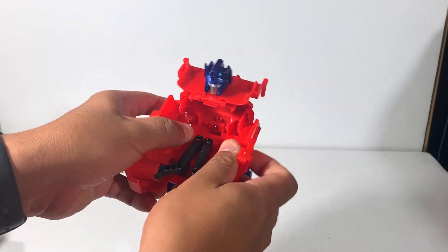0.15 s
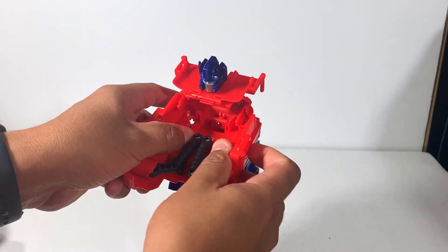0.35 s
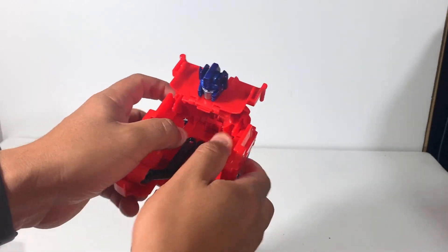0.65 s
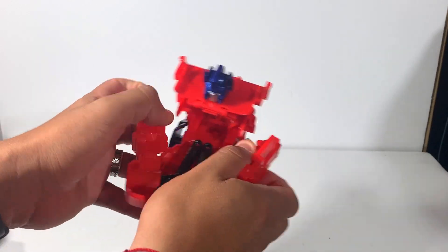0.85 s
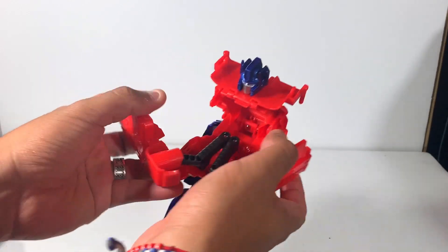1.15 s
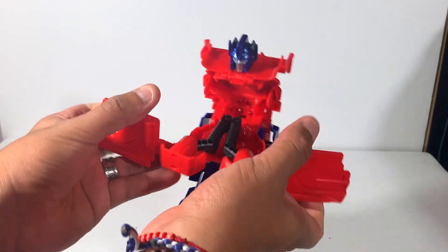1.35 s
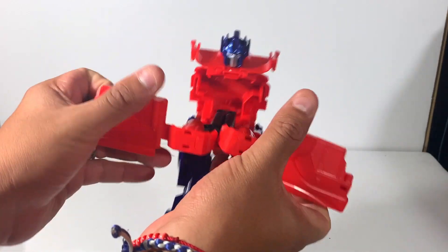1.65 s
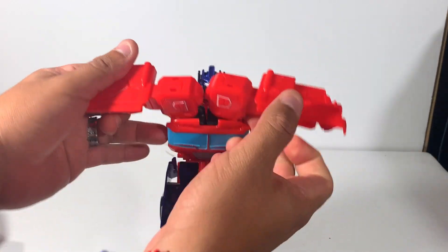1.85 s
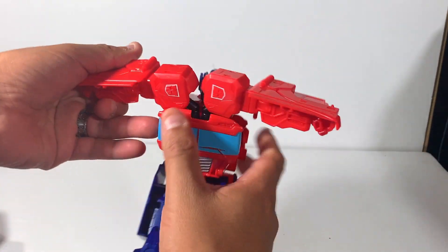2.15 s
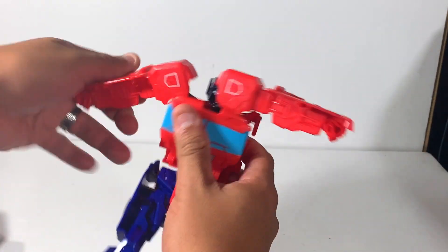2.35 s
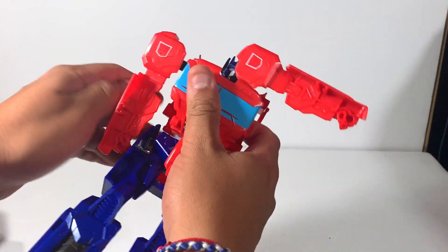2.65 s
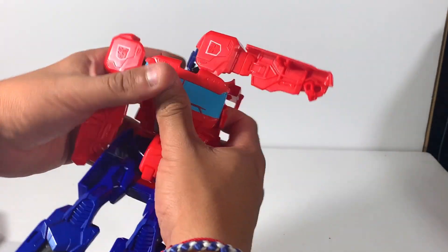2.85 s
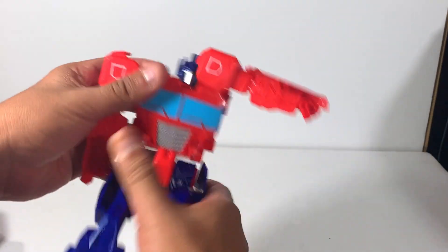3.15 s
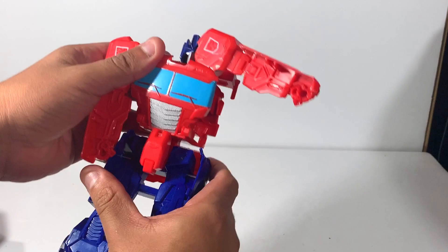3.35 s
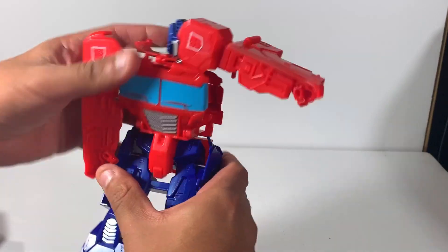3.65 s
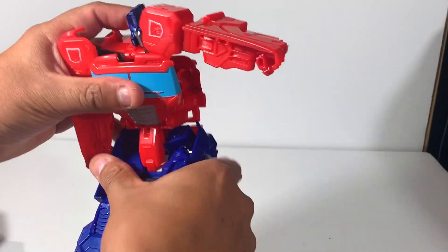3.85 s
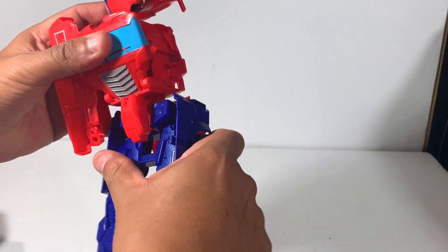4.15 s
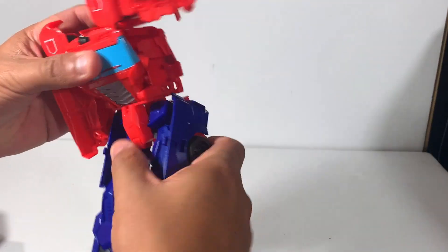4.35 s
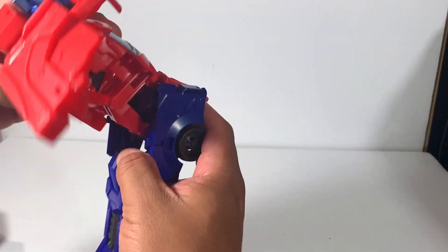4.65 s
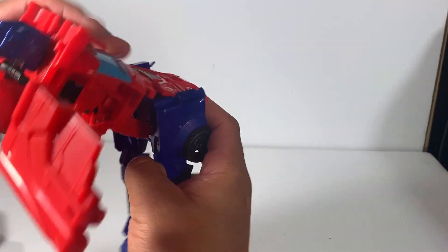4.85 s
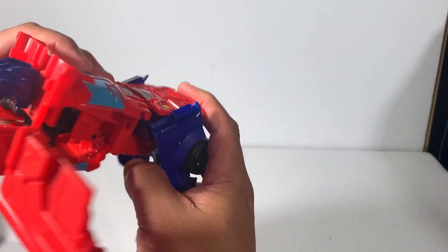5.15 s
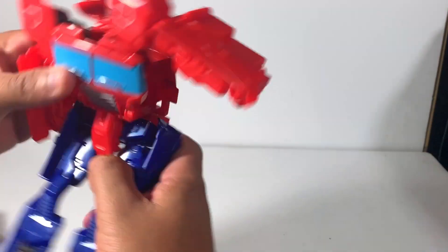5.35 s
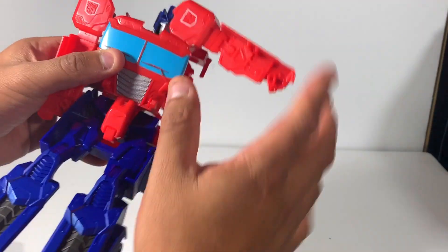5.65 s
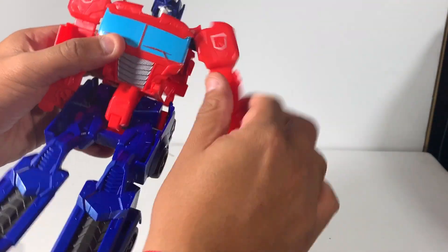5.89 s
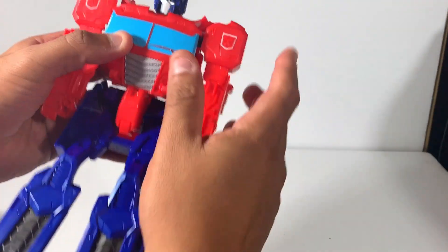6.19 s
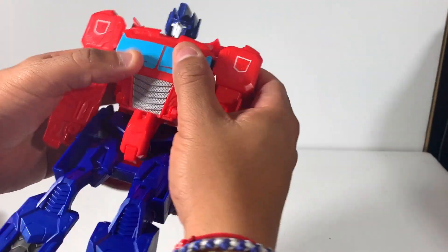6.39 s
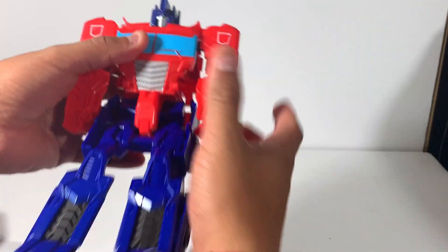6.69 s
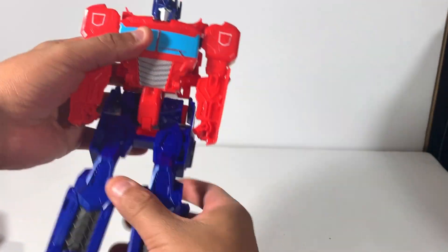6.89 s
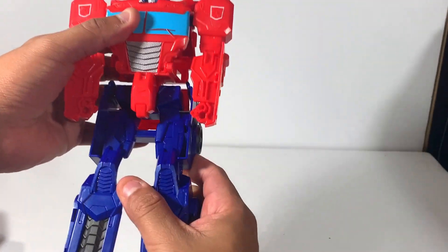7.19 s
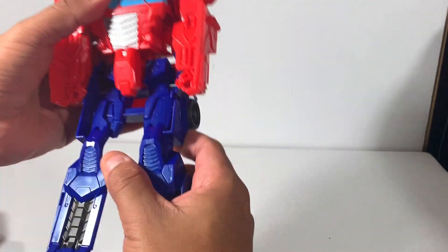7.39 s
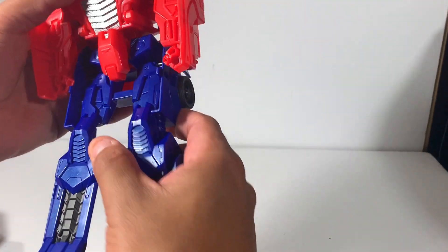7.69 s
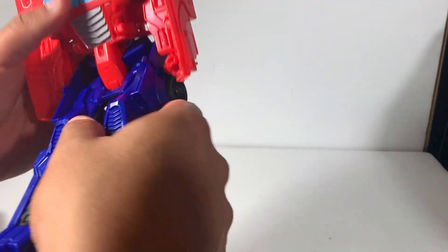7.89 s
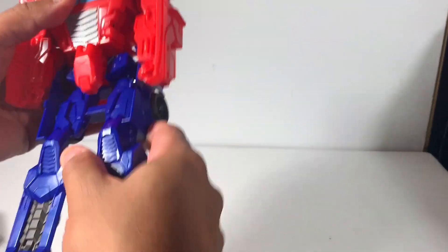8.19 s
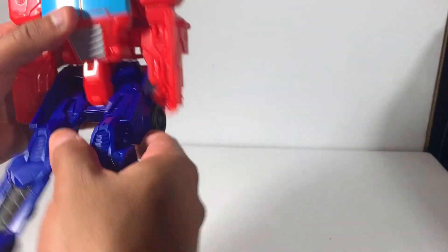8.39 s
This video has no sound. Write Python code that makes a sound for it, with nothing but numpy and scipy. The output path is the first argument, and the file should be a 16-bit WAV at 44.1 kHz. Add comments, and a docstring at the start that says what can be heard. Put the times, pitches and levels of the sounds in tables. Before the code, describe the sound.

Hands twist and snap the hollow plastic parts of a toy figure, sharp clicks and clacks in irregular bursts with faint rubbing between.

```python
"""In a small padded booth, hands twist and snap the parts of a hollow plastic toy close to two microphones.
Each snap is a short burst of chattering contact, shaped noise and one hard blow, that cracks and rings the parts.
Between snaps random grains rub and rattle, narrow resonances of friction squeak faintly and low noise swells
as the hands bump softly. The toy sits left of centre, so the right microphone hears it a little later."""
import sys
import numpy as np
from scipy import signal
from scipy.fft import rfft, irfft, next_fast_len
from scipy.io import wavfile
from scipy.ndimage import map_coordinates

SR = 44100
rng = np.random.default_rng(int(sys.argv[2]) if len(sys.argv) > 2 else 0)


def transcribe(signal):
    """Save signal, clipped to [-1, 1], as a 16-bit WAV file at the path in sys.argv[1]."""
    frames = np.atleast_2d(signal).T
    limited = np.clip(frames, -1, 1)
    pcm = np.round(limited * 32767).astype(np.int16)
    wavfile.write(sys.argv[1], SR, pcm)


N = 376173

# Snaps and knocks: [t/s, drive of the middle parts level/dB, big shells re middle level/dB,
# small tabs re middle level/dB, pitch of the struck part f/Hz]
SNAPS = [(0.0171, -24.5, 1, 4.5, 1470), (0.1764, -45, 7, -4, 1960), (0.225, -48, 10, 9, 1250),
         (0.2372, -36, 3.5, 10.5, 1070), (0.281, -27, -4, 3, 1920), (0.417, -49.5, 0, -10, 1630),
         (0.4928, -23.5, 5, 2.5, 1635), (0.643, -39.5, -20, -19, 7100), (0.717, -52, 6, -15, 2860),
         (0.8102, -25, -4, 9.5, 5520), (0.845, -21.5, -18, -5, 2780), (1.3429, -36, -9, -39, 2120),
         (1.5016, -22.5, -12, -13, 2580), (1.74, -39, -38, -27, 5040), (1.772, -46.5, 0, -17, 2230),
         (2.0018, -29.5, -23, -6, 4500), (2.08, -28.5, 2.5, -12, 2540), (2.2038, -45, -8, -7, 4900),
         (2.228, -24, -14, -32, 5450), (2.2742, -21, -8, -4, 5340), (2.404, -45, 1.5, -22, 3020),
         (2.4568, -27.5, -0.5, 6.5, 3820), (2.58, -37.5, -2, 3, 6000), (2.5976, -15, 0, 5, 2410),
         (2.6937, -41, -41, 20.5, 2820), (2.7295, -24.5, -47.5, 9.5, 2820), (2.7631, -27, -6, 12.5, 6450),
         (2.789, -24.5, -24, 7.5, 2840), (2.8844, -19.5, 0, 15.5, 4170), (3.035, -34, -8, 9, 2570),
         (3.093, -38, -0.5, 5, 1110), (3.13, -37, -11, 8.5, 3160), (3.1489, -32.5, 6.5, 9, 1490),
         (3.1937, -12, -35, 13.5, 5850), (3.2059, -16.5, 2, 11, 1830), (3.238, -20, -14, -17, 2420),
         (3.2598, -24.5, 3.5, 8.5, 1197), (3.383, -39.5, -6, -23.5, 4750), (3.6103, -22.5, -3.5, -5, 1910),
         (3.6392, -18.5, 3, 7, 3920), (3.728, -12, -9, 6, 4500), (3.759, -30, 4, 9, 2600),
         (3.804, -26.5, 0.5, 5, 1670), (3.8535, -26, -0.5, 6.5, 6550), (3.8955, -39, 8.5, 6, 1930),
         (3.938, -35, -21, -3, 4760), (4.07, -34, -1, -4, 4760), (4.1044, -25, -0.5, 3.5, 4480),
         (4.3286, -35, -3.5, 6.5, 4470), (4.442, -35, -4.5, -10, 2780), (4.51, -32, -2, -6, 4700),
         (4.55, -37.5, -11, -5, 5070), (4.7732, -43, 8.5, -24, 2920), (4.815, -32, -23, -11, 3480),
         (4.874, -32.5, -2, -3, 3680), (4.8925, -27.5, 1, 4.5, 1210), (5.1176, -37.5, 3, 6, 3650),
         (5.1966, -38.5, -19, -13, 3800), (5.244, -33.5, 2, -2, 990), (5.3623, -35.5, -28, -11, 4270),
         (5.4056, -28, -5, 1, 5000), (5.4571, -24, -0.5, -14, 5120), (5.5172, -28.5, -2.5, 4, 4800),
         (5.598, -50, 8, -17, 3500), (5.874, -13.5, -1.5, -5.5, 2020), (5.915, -14, -7, 7.5, 5220),
         (6.042, -29, -4.5, 0, 1190), (6.1545, -36, 7, 6.5, 2230), (6.2111, -38, 6.5, -19, 1730),
         (6.2668, -29, -7, 0, 4260), (6.351, -23, 3.5, 1.5, 4370), (6.516, -21.5, -2.5, 1, 2350),
         (6.6865, -18.5, -31, 3.5, 5570), (6.6945, -16, -9.5, 15, 4270), (6.7028, -22.5, -21, -3, 4460),
         (6.813, -26.5, -1, 0, 5200), (6.844, -27.5, -25, -1, 4600), (6.9301, -25, -52, 1.5, 5330),
         (6.9504, -27, -3.5, 3, 5200), (7.0723, -45, 0.5, -8.5, 4300), (7.12, -51, 6.5, -5.5, 1280),
         (7.295, -53.5, 5.5, -3, 2850), (7.4142, -45, -1, -24, 5700), (7.692, -57, 6, -8, 1006),
         (7.727, -47, -2, 0, 5000), (7.741, -27.5, -7, -7, 2110), (7.862, -42.5, 7, -1, 1600),
         (7.881, -19, -6, -6, 1680), (7.902, -24, 1.5, -1.5, 5300), (8.016, -33, -26, -9, 5660),
         (8.074, -29.5, 4, 1, 3520), (8.104, -36, -22, 9, 5040), (8.153, -29.5, -3, 6.5, 5300),
         (8.3049, -26, -1.5, -7, 2400), (8.345, -18, -6, 1, 2440), (8.369, -20.5, -2, -1, 1660),
         (8.396, -26, 2, -5, 4840), (8.4356, -16.5, -3.5, -1, 2580), (8.4593, -12.5, -4, -6, 2060),
         (8.4703, -13.5, -14, 8.5, 2600), (8.4839, -17, -3, 8.5, 3560), (8.507, -26, -17, 5, 4770)]
# Twists and slides of part on part: [start of the hold t/s, hold t/s, middle parts level/dB,
# brightness/dB (raises the small tabs, lowers the big shells)]
TWISTS = [(0.0, 0.0064, -54, -5.5), (0.271, 0.038, -57.5, -2.5), (.66, 0.096, -68, 3),
          (.76, 0.034, -62.5, 0.5), (0.848, 0.0062, -43.5, -3), (1.08, 0.0093, -62.5, 2.5),
          (1.23, 0.66, -71, 1.5), (1.8, 0.016, -65, 12.5), (1.9, 0.18, -72.5, -1), (2.234, 0.08, -50, 2.5),
          (2.471, 0.023, -55, 0), (2.619, 0.036, -53, -2.5), (2.82, 0.12, -64, -5.5),
          (2.95, 0.095, -53.5, 0.5), (3.1, 0.19, -48, 0.5), (3.637, 0.057, -47.5, -1),
          (3.75, 0.08, -60.5, 4), (3.92, 0.085, -58, -3), (4.053, 0.042, -49, -0.5),
          (4.35, 0.047, -55.5, -1), (4.519, 0.1, -60.5, -4), (4.77, 0.044, -48, 1.5),
          (4.96, 0.063, -59, -0.5), (5.203, 0.096, -53.5, -2), (5.404, 0.054, -45, 1),
          (5.78, 0.017, -66.5, -0.5), (5.892, 0.038, -40.5, 2.5), (6.0, 0.12, -59.5, 0),
          (6.2, 0.41, -64.5, -1), (6.44, 0.023, -51, -4.5), (6.6, 0.14, -60, -3.5), (6.832, .13, -50, -0.5),
          (7.43, 0.011, -70, 0.5), (7.897, 0.0016, -46.5, 0), (8.101, 0.058, -50, -2),
          (8.46, 0.011, -50, 4)]
# Broad crack of big shells, middle parts, small tabs: [low f/Hz, high f/Hz, level/dB, chatter t60 t/s]
CRACK_BANDS = [(800, 3430, -12, 0.034), (3370, 7920, -6.5, 0.019), (7840, 13070, -7, 0.024)]

SEAT_S = 0.002            # from the start of a snap to the hard blow that seats the part
RING_SPREAD_DB = 4.0      # chance in the strength of blows, catches and struck modes


def from_db(db):
    """Turns decibels into an amplitude factor."""
    return 10 ** (np.asarray(db) / 20)


def rms_one(x):
    """Brings a signal to rms 1."""
    return x / np.sqrt(np.mean(x ** 2) + 1e-20)


def coloured(x, points):
    """Shapes the spectrum of a signal by (Hz, dB) points, joined along log frequency."""
    size = next_fast_len(N)
    hz = np.maximum(np.arange(size // 2 + 1) * SR / size, 1)
    point_hz, point_db = np.array(points).T
    gain = from_db(np.interp(np.log(hz), np.log(point_hz), point_db))
    return irfft(rfft(x, size) * gain, size)[..., :N]


def drift(rate):
    """Slow random wander of rms 1, with `rate` new values per second."""
    knots = rng.standard_normal(int(N / SR * rate) + 2)
    return rms_one(np.interp(np.arange(N) / SR * rate, np.arange(len(knots)), knots))


def ring(force, hz, width):
    """One damped mode: a unit click sets a sine of about height 1 ringing."""
    r, w = np.exp(-np.pi * width / SR), 2 * np.pi * hz / SR
    return signal.lfilter([0, np.sin(w)], [1, -2 * r * np.cos(w), r * r], force + 1e-18)


def contact_envelope(times, level_db, rise_s, t60):
    """Every contact adds a quick build-up and an exponential decay."""
    jumps = np.zeros(N)
    jumps[(times * SR).astype(int)] = from_db(level_db)
    fall, rise = from_db(-60 / (t60 * SR)), np.exp(-1 / (rise_s * SR))
    return signal.lfilter([1 - rise], np.convolve([1, -fall], [1, -rise]), jumps + 1e-18)


def part_of(hz):
    """Size class that sounds a pitch: 0 big shells, 1 middle parts, 2 small tabs."""
    return int(hz > 3000) + int(hz > 7000)


def air():
    """Steady room tone and hiss: shaped noise, partly common to both sides."""
    # Relative spectrum of the air: [f/Hz, level/dB]
    air_spectrum = [(20, -45.5), (36, -15.5), (75, -13), (170, -24), (300, -27), (1400, -42),
                    (14400, -40.5), (16000, -52)]
    air_db, alike = -66.0, 0.75   # overall rms, left-right correlation
    mid, side = coloured(rng.standard_normal((2, N)), air_spectrum)
    stereo = np.sqrt(1 + alike) * mid + np.sqrt(1 - alike) * side * [[1], [-1]]
    return from_db(air_db) * rms_one(stereo)


def booth(x):
    """Dense dull reflections, unrelated on the two sides; their pattern keeps changing as the toy moves."""
    t60_s, wall_low_hz, wall_cut_hz = 0.091, 400, 4880
    t, out = np.arange(SR // 4) / SR, 0
    # three reflection patterns share the sound by wandering amounts of constant total power
    places = np.array([drift(12) for _ in range(3)])
    places /= np.sqrt(np.sum(places ** 2, axis=0))
    walls = signal.butter(1, [wall_low_hz, wall_cut_hz], "band", fs=SR)
    for share in places:
        decay = from_db(-60 * t / t60_s) * np.minimum(t / 0.0014, 1)
        tail = signal.lfilter(*walls, rng.standard_normal((2, len(t))) * decay)
        tail /= np.sqrt(np.sum(tail ** 2, axis=1, keepdims=True))
        out = out + signal.oaconvolve((share * x)[None], tail, axes=1)[:, :N]
    return out


def microphones(x):
    """The longer path delays the right microphone; the low end is stronger on the left."""
    # Lag of the right microphone as the toy moves: [t/s, lag t/s]
    right_lag = [(0, .0001), (2.3, 0.000092), (2.6, 0.0002157), (8.53, 0.00022)]
    # Balance of the two sides: [f/Hz, left over right level/dB]
    left_over_right = [(100, 1), (300, 5), (1200, 4), (3000, 0), (10000, 0)]
    booth_db = -2.5   # reflections relative to the direct sound
    lag_t, lag_s = np.transpose(right_lag)
    lag = np.interp(np.arange(N) / SR, lag_t, lag_s)
    delayed = map_coordinates(x, [np.arange(N) - lag * SR], order=3)
    left, right = from_db(booth_db) * booth(x) + [x, delayed]
    # each side takes half of the difference
    return np.array([coloured(left, [(hz, db / 2) for hz, db in left_over_right]),
                     coloured(right, [(hz, -db / 2) for hz, db in left_over_right])])


def hands():
    """Soft bumps of the hands: lumpy low noise that swells and dies, over the faint unrest of the grip."""
    # Bumps: [t/s, nominal level/dB]
    hand_bumps = [(.24, -56), (0.7, -52), (0.807, -48.5), (4.08, -61.5), (4.44, -51.5), (5.1, -60),
                  (5.399, -48.5), (6.55, -51), (7.3, -66), (7.88, -53), (8.101, -50.5), (8.2, -55)]
    rise_s, t60_s, rest_db = 0.0067, 0.5, -72
    times, level_db = np.transpose(hand_bumps)
    bumps = contact_envelope(times, level_db, rise_s, t60_s)
    low_band = signal.butter(2, [135, 430], "band", fs=SR, output="sos")
    noise = signal.sosfilt(low_band, rng.standard_normal(N))
    return (bumps + from_db(rest_db)) * rms_one(noise * from_db(3 * drift(25)))


def grains():
    """Rubbing: tiny slips at random moments, a few much larger than the rest, slightly blunted; rms 1."""
    grains_per_s, spread_db = 3000, 4.5
    sizes = from_db(spread_db * np.minimum(rng.exponential(1, N), 5)) * rng.choice([-1, 1], N)
    slips = sizes * (rng.random(N) < grains_per_s / SR)
    return rms_one(signal.lfilter(*signal.butter(1, 9000, fs=SR), slips))


def squeaks():
    """A tight joint squeaks: grainy friction twice through one resonance, swelling and fading."""
    # Squeaks: [start t/s, length t/s, pitch f/Hz, level before the swell and fade/dB]
    joint_squeaks = [(1.645, 0.092, 2577, -62.5), (1.775, 0.068, 4670, -50), (1.777, 0.065, 5400, -49),
                     (1.893, 0.052, 2600, -58), (2.004, 0.048, 1233, -56.5)]
    q = 16   # sharpness of each resonance
    out = np.zeros(N)
    for start, length, hz, level_db in joint_squeaks:
        i, size = int(start * SR), int(length * SR)
        tone = ring(ring(grains()[:SR // 4], hz, hz / q), hz, hz / q)
        out[i:i + size] += from_db(level_db) * rms_one(tone[-size:]) * np.sqrt(np.hanning(size))
    return out


def twisting(level_db):
    """Envelope of rubbing: the twists swell, hold and fade at shared rates and add up."""
    swell_db_per_s, fade_db_per_s = 357, 209
    start, hold = np.array(TWISTS)[:, :2].T
    t = np.arange(0, N + 64, 64)[:, None] / SR   # one point every 64 samples
    swell_db = -swell_db_per_s * np.maximum(start - t, 0)
    fade_db = -fade_db_per_s * np.maximum(t - start - hold, 0)
    return np.interp(np.arange(N) / SR, t[:, 0], from_db(swell_db + fade_db) @ from_db(level_db))


def chatter(level_db, t60):
    """Envelope of snapping contact: each snap builds up within about a millisecond, then dies away."""
    return contact_envelope(np.array(SNAPS)[:, 0], level_db, 0.0009, t60)


def struck_notes(snap_db):
    """Every snap sounds the short note of the part that is hit, once the contact has built up."""
    note_db, width_hz = 4, 240
    out, click = np.zeros(N + SR), np.zeros(SR // 20)
    click[int(SEAT_S * SR)] = 1
    for k, (s, *_, hz) in enumerate(SNAPS):
        i = int(s * SR)
        level = from_db(snap_db[part_of(hz)][k] + note_db)
        out[i:i + len(click)] += level * ring(click, hz, width_hz)
    return out[:N]


def cracks(snap_db, slide, rough, strengths):
    """Chatter, a seating blow, catching joints and rubbing drive each part's broad band; the shells also thud."""
    seat_db = 15.0
    ticks_per_s, tick_db = 70, 13.0          # a sliding joint catches and lets go
    rattle_db, rattle_t60_s = -25.5, 0.16    # loose parts rattle on after a snap
    clump_db = 3.0                           # slips come in clumps
    thud_hz, thud_db = 260, -27.5            # the hands and the whole toy give way
    out = np.zeros(N)
    seats = ((np.array(SNAPS)[:, 0] + SEAT_S) * SR).astype(int)
    catch_size = from_db(tick_db + RING_SPREAD_DB * rng.standard_normal(N))
    catches = (rng.random(N) < ticks_per_s / SR) * catch_size
    for part, (low, high, crack_db, t60) in enumerate(CRACK_BANDS):
        ticks = signal.lfilter([1], [1, -from_db(-60 / (t60 * SR))], catches + 1e-18) * slide[part]
        force = from_db(crack_db) * (chatter(snap_db[part], t60) + ticks) * rough
        force[seats] += from_db(crack_db + snap_db[part] + seat_db + RING_SPREAD_DB * strengths[:, part])
        loose = slide[part] + chatter(snap_db[part] + rattle_db, rattle_t60_s)
        force = force + loose * from_db(clump_db * drift(60)) * grains()
        band = signal.butter(3, [low, high], "band", fs=SR, output="sos")
        crack = signal.sosfilt(band, force) * np.sqrt(SR / 2 / (high - low))   # same power at any width
        out += crack * (-1) ** part   # neighbours add where they overlap
        if part == 0:
            out += from_db(thud_db) * ring(force, thud_hz, thud_hz)
    return out


def ringing_parts(snap_db, slide, rough, strengths):
    """Struck and rubbed modes of the plastic; every contact lands elsewhere and favours other modes."""
    # Modes of the plastic parts: [f/Hz, width f/Hz, level/dB]
    plastic_modes = [(985.6, 45, -9.5), (1278, 68, -5.5), (1465, 400, 2.5), (1643, 92, -13), (1979, 64, -4),
                     (2230, 27, -9.5), (2580, 430, 1), (3840, 240, -5), (4530, 290, 2.5), (5300, 130, -10),
                     (5970, 170, -12)]
    struck_db, rubbed_db = -30, -24.5
    rub_spread_db = 6.0   # sliding contact wanders from mode to mode
    out = np.zeros(N)
    for k, (hz, width, mode_db) in enumerate(plastic_modes):
        part = part_of(hz)
        t60 = CRACK_BANDS[part][3]
        struck = chatter(snap_db[part] + struck_db + RING_SPREAD_DB * strengths[:, k], t60) * rough
        rubbed = slide[part] * from_db(rubbed_db + rub_spread_db * drift(20)) * grains()
        out += from_db(mode_db) * ring(struck + rubbed, hz, width)
    return out


def toy():
    """Big shells, middle parts and small tabs crack and ring under shared contacts; no deep bass radiates."""
    middle_db, shells_db, tabs_db = np.array(SNAPS)[:, 1:4].T
    rub_db, bright_db = np.array(TWISTS)[:, 2:].T
    snap_db = [middle_db + shells_db, middle_db, middle_db + tabs_db]
    slide = [twisting(rub_db - bright_db - 6.0), twisting(rub_db), twisting(rub_db + bright_db - 3.0)]
    rough = rng.standard_normal(N)
    strengths = rng.standard_normal((len(SNAPS), 11))   # one column for each plastic mode
    sound = struck_notes(snap_db)
    sound += cracks(snap_db, slide, rough, strengths)
    sound += ringing_parts(snap_db, slide, rough, strengths)
    return signal.sosfilt(signal.butter(2, 254, "high", fs=SR, output="sos"), sound)


def scene():
    """Toy, squeaks and hands reach the microphones through the booth, over the air."""
    return microphones(toy() + squeaks() + hands()) + air()


def record(dry):
    """Two dips colour the treble, near 7.2 and 11.7 kHz; peaks are rounded, the top is cut."""
    # Dips in the treble: [f/Hz, width f/Hz, share removed at the centre]
    treble_dips = [(7200, 900, .5), (11700, 1300, .85)]
    peak_limit, cutoff_hz = 0.9, 16600   # the cutoff is where the filter reaches 70 dB down
    for hz, width, share in treble_dips:
        dry = dry - share * signal.lfilter(*signal.iirpeak(hz, hz / width, fs=SR), dry)
    dry = peak_limit * np.tanh(dry / peak_limit)
    return signal.sosfilt(signal.cheby2(12, 70, cutoff_hz, fs=SR, output="sos"), dry)


dry = scene()
out = record(dry)
transcribe(out)
```